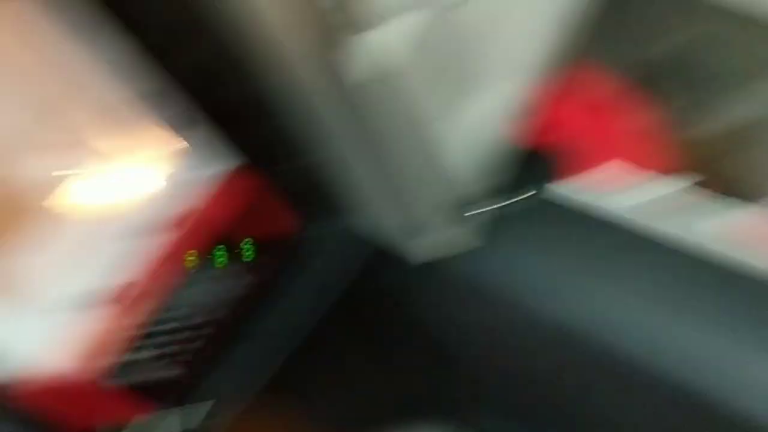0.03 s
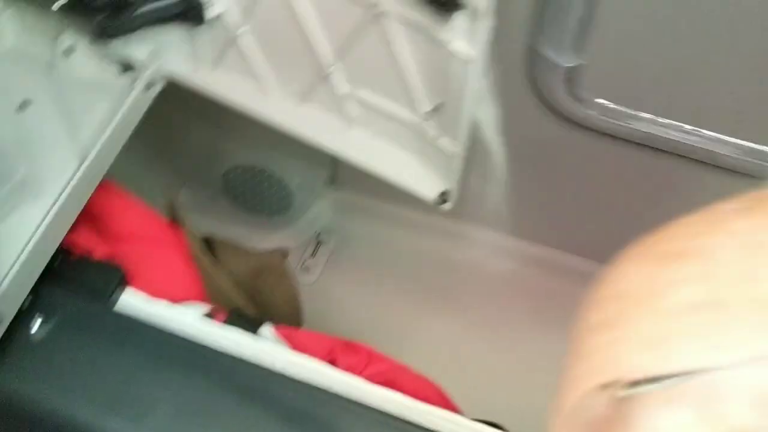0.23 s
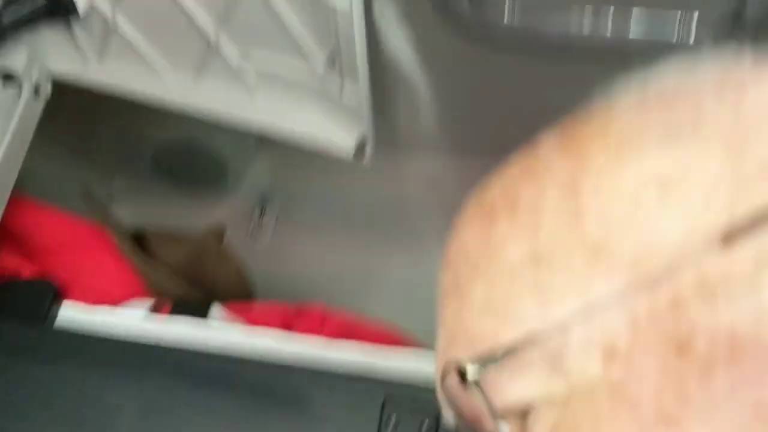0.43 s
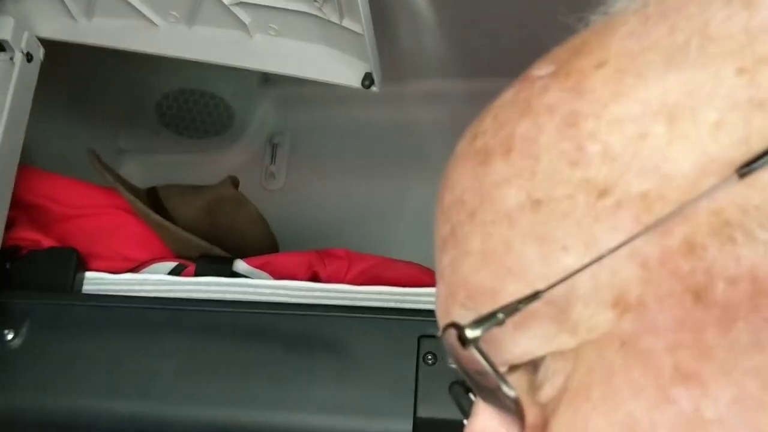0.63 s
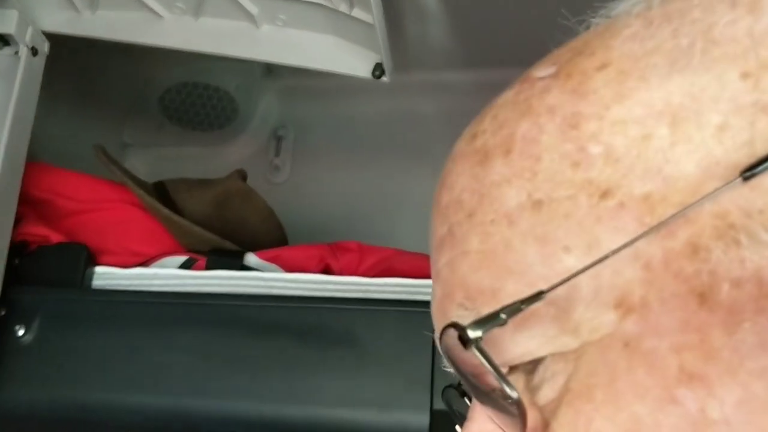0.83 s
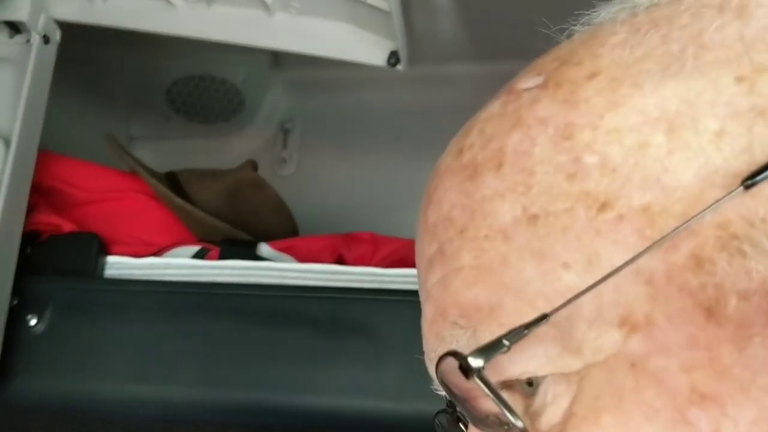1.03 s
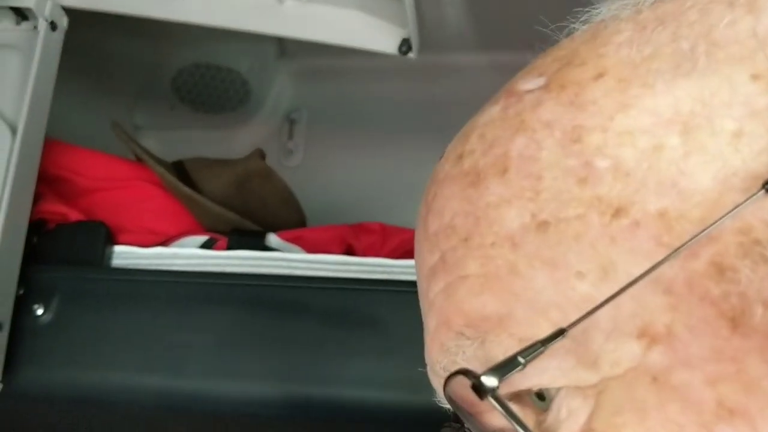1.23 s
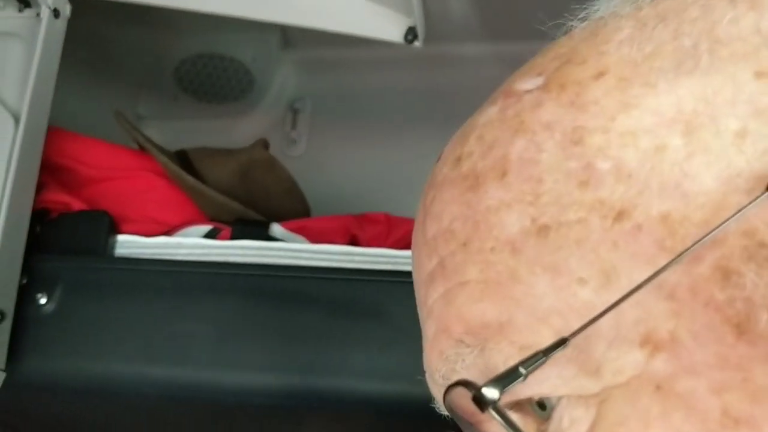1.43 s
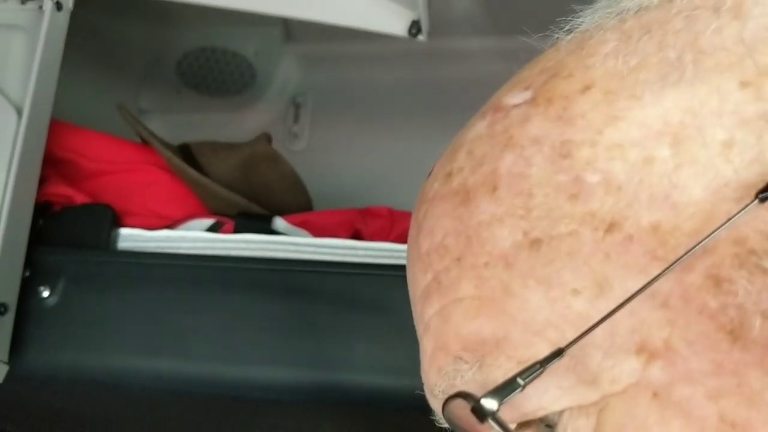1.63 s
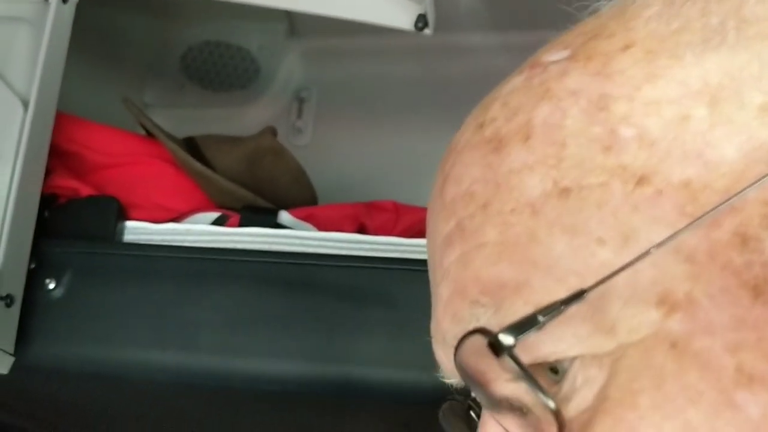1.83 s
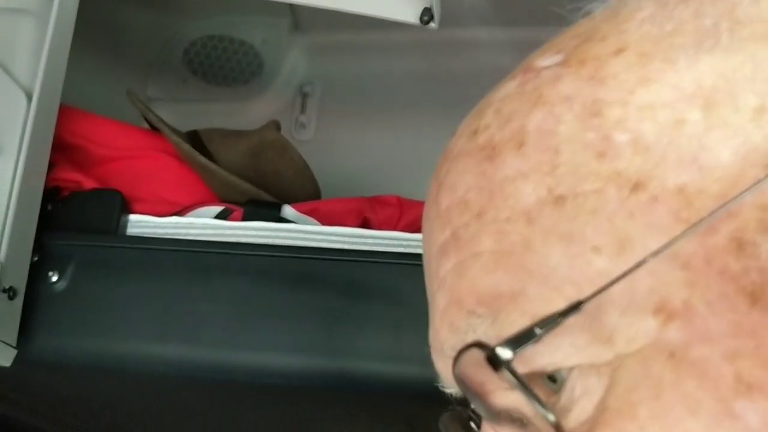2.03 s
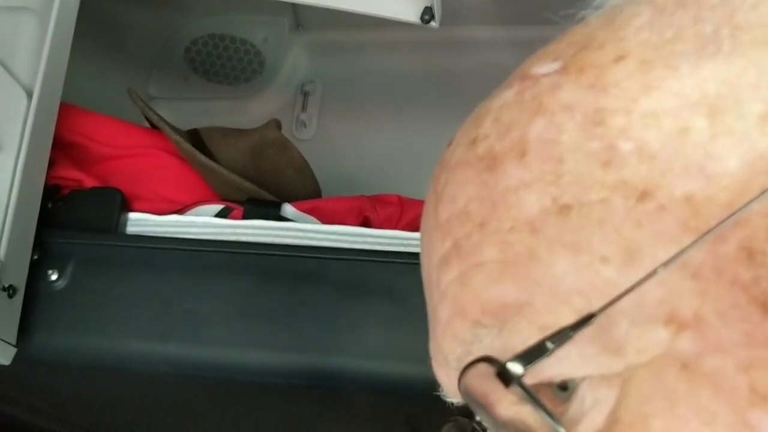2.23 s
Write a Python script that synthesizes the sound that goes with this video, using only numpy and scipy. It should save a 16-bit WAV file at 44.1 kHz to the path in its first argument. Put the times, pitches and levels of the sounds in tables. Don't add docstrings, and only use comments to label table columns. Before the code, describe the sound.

Low, rough diesel idle hums inside a cab, with close paper plate snaps, rustles and scrapes

```python
import sys
import numpy as np
from scipy import signal
from scipy.io import wavfile
from scipy.ndimage import uniform_filter1d

SR = 44100
rng = np.random.default_rng(int(sys.argv[2]) if len(sys.argv) > 2 else 0)


def wav_out(sig):
    wavfile.write(sys.argv[1], SR, np.round(np.clip(np.atleast_2d(sig).T, -1, 1) * 32767).astype(np.int16))


def ratio(d):
    e = np.asarray(d, float) / 20
    return 10 ** e


N = 100239

# frequency in Hz, level in dB.
RUMBLE = [(15, -66), (80, -72.5), (135, -78.5), (300, -83), (600, -88), (1000, -98), (1900, -107),
          (4000, -113)]
# frequency in Hz, level in dB.
HISS = [(500, -112), (2000, -112), (5000, -117), (9000, -118), (13000, -120), (16000, -123)]
ORDER_DB = [-37.9, -40.3, -40.9, -55, -45.9, -62.6, -38.2, -42.8, -71.7, -71, -68.8, -48.6, -54.1, -69.8,
            -61.9, -76.7, -66.6, -66.6, -66.5, -64.2, -63.4, -66.5, -66.8, -66.5, -71.4, -81, -84, -74.3,
            -84, -64.8]
# first tone number carried, delay into the cycle in seconds.
PATHS = [
    (1, .0216),
    (2, .0156),
    (4, .0359),
    (7, .0391),
    (9, .03365),
    (14, .0353),
]
# centre in seconds, length in seconds, level in dB, pitch in Hz.
BUMPS = [
    (.13, .09, -50, 82),
    (1.545, .12, -45, 176),
    (1.8, .05, -50, 45),
]
# centre in seconds, length in seconds, level in dB,
# rim level against the low part in dB, rim pitch in Hz.
BRUSHES = [(0.441, 0.15, -69.5, -1.5, 8040), (0.518, 0.12, -71.5, 4.5, 8300),
           (0.657, 0.13, -71.5, -2.5, 7400), (0.742, .1, -71.5, -5, 6130), (0.81, 0.091, -69.5, -4, 8300),
           (.875, 0.089, -64.5, -8.5, 5500), (0.94, 0.26, -82.5, 3, 7100), (1.141, 0.019, -64, -17, 8000),
           (1.208, 0.088, -61, -12.5, 8800), (1.317, 0.13, -71, -1, 5600), (1.395, 0.092, -65.5, -20, 5000),
           (1.553, 0.13, -58, -6, 9500), (1.724, 0.048, -66.5, -9.5, 9200), (1.92, 0.1, -67.5, -14, 5000),
           (2.071, 0.065, -69.5, -13, 6000), (2.241, .03, -73.5, 2, 7000), (2.275, 0.06, -64.5, -7.5, 9000)]
# start in seconds, length in seconds, body level in dB, edge level in dB.
SCRAPES = [(1.469, 0.0082, -58.5, -62), (1.476, 0.0074, -59, -60), (1.485, 0.014, -59.5, -61),
           (1.504, 0.011, -54, -59), (1.513, 0.007, -58, -64), (1.525, 0.0063, -50.5, -59),
           (1.532, 0.0044, -42.5, -48.5), (1.539, 0.016, -49.5, -55.5), (1.557, 0.013, -55, -55.5),
           (1.574, .007, -58, -58), (1.578, 0.0089, -55.5, -55), (1.596, .008, -57, -58.5),
           (1.606, 0.041, -75, -73), (1.79, 0.0086, -53, -60.5), (1.798, 0.0035, -60, -57),
           (1.801, 0.0062, -53.5, -49.5), (1.811, 0.0044, -53, -62), (1.818, 0.018, -69, -71),
           (2.236, 0.0065, -62, -73)]
# pitch in Hz, width in Hz, level in dB.
BODY = [(1250, 700, -15), (2280, 260, 0), (3030, 260, -7), (3550, 300, -13), (5000, 1200, -25)]
# pitch in Hz, width in Hz, level in dB.
EDGE = [(6300, 1900, -16), (8550, 2500, 10), (9500, 1080, 11.5), (10800, 2400, 9), (14000, 3900, -17)]
# start in seconds, peak level in dB, pitch in Hz, width in Hz.
SNAPS = [(0.091, -58, 3000, 3000), (0.4451, -24.5, 6960, 2370), (.5347, -50, 7000, 6000),
         (0.5937, -48.5, 3700, 2950), (.6325, -58, 2410, 600), (0.687, -56, 11500, 3000),
         (0.756, -56, 4500, 3000), (.802, -57, 6000, 6000), (1.0129, -48.5, 10200, 4000),
         (1.145, -55, 11000, 6000), (1.163, -52, 6000, 4000), (1.197, -50, 7460, 4000),
         (1.326, -45.5, 9900, 8000), (1.388, -53, 8050, 6000), (1.418, -57, 14000, 2500),
         (1.438, -56, 5000, 6000), (1.454, -68, 4000, 4000), (1.681, -55, 11600, 2500),
         (1.8122, -35, 8900, 5000), (1.851, -60, 10000, 1500), (2.238, -48, 1470, 900)]

FLOOR_DB, PATCH_DB = 33, 1.1
CYCLE_HZ, HUNT_S = 18.9785, .00012
HIGH_DB, HIGH_FALL_DB, HIGH_SPREAD_DB = -76.5, -.5, 4
SHAKE, SHAKE_PER_ORDER, MOST_SHAKE, SHAKE_HZ = 0.023, 0.017, .17, 9
SIZE_SHARE = .45
BRUSH_HZ, BRUSH_WIDTH_HZ, RIM_WIDTH_HZ = 2410, 2430, 2800
SLIPS_PER_S, SLIP_SPREAD_DB, SMOOTH = 1200, 2.5, .8
ECHO_S, ECHO_DB, TAIL_DB, TAIL_T60_S = .0016, -10, -37, .06
SPLIT, SPLIT_S = .35, .0004
KNOCK_DB, SKIRT = -7, 1.2
TOP_HZ, OPEN_S = 15650, .004


def evened(x):
    return x / np.sqrt(np.mean(x ** 2) + 1e-20)


def read(points, hz):
    f, value = np.transpose(points)
    return np.interp(np.log(hz + 1), np.log(f + 1), value)


def ring(x, hz, width):
    return signal.lfilter(*signal.iirpeak(min(hz, 20000), hz / width, SR), x)


def ring_twice(x, hz, width):
    return ring(ring(x, hz, width), hz, 2 * width)


def drift(count, top_hz):
    t = np.arange(0, N + 128, 64) / SR
    hz = np.geomspace(1.5, top_hz, num=12)
    turns = hz[:, None] * t + rng.random((count, len(hz), 1))
    slow = np.sin(2 * np.pi * turns).sum(axis=1) / np.sqrt(len(hz) / 2)
    return [np.interp(np.arange(N) / SR, t, row) for row in slow]


def window(start, length, rise):
    t = np.arange(N) / SR - start
    return np.sin(np.pi / 2 * np.clip(np.minimum(t, length - t) / rise, 0, 1)) ** 2


def stroke(start, length):
    t = np.arange(N) / SR - start
    catch = np.clip(t / 0.0021, 0, 1)
    return catch * np.cos(np.pi / 2 * np.clip(t / (1.45 * length), 0, 1))


def cab_floor():
    frames, hz = N // 512 + 6, np.fft.rfftfreq(2048, 1 / SR)
    real, imaginary, patches = rng.standard_normal((frames, len(hz), 3)).T
    patches = uniform_filter1d(patches, size=30, axis=0)
    patches = evened(uniform_filter1d(patches, size=6, axis=1))
    octaves_above = np.maximum(np.log2(hz / 4000 + 1e-9), 0)
    rumble = ratio(read(RUMBLE, hz) - 16 * octaves_above)
    gain = np.hypot(rumble, ratio(read(HISS, hz)))
    spectrum = (real + 1j * imaginary) * gain[:, None] * ratio(FLOOR_DB + PATCH_DB * patches)
    return signal.istft(spectrum, nperseg=2048, noverlap=1536)[1][:N] / 8


def engine():
    extra = np.arange(30)
    high = HIGH_DB + HIGH_FALL_DB * extra + HIGH_SPREAD_DB * rng.standard_normal(len(extra))
    levels = np.r_[ORDER_DB, high]
    t = np.arange(N) / SR + HUNT_S * drift(count=1, top_hz=4.09)[0]
    scatter = rng.random(len(levels))
    waver = drift(count=2 * len(levels), top_hz=SHAKE_HZ)
    out = np.zeros(N)
    for i, db in enumerate(levels):
        k = i + 1
        lag = scatter[i]
        if k < 22:
            lag = [s for first, s in PATHS if first <= k][-1]
        angle = 2 * np.pi * k * CYCLE_HZ * (t - lag)
        shake = min(SHAKE + SHAKE_PER_ORDER * k, MOST_SHAKE)
        size = 1 + SIZE_SHARE * min(1 + k / 30, 2) * shake * waver[2 * i]
        sway = shake * waver[2 * i + 1]
        out += ratio(db) * np.sqrt(2) * (size * np.cos(angle) + sway * np.sin(angle))
    return out


def bumps():
    t = np.arange(N) / SR
    out = np.zeros(N)
    for centre, length, db, hz in BUMPS:
        swell = window(centre - length / 2, length, length / 2)
        out += ratio(db) * swell * np.sin(2 * np.pi * hz * (t - centre))
    return out


def brushes():
    grain = ratio(2.2 * evened(uniform_filter1d(rng.standard_normal(N), size=90)))
    low, top = rng.standard_normal((2, N)) * grain
    low = evened(ring_twice(low, BRUSH_HZ, BRUSH_WIDTH_HZ))
    out = np.zeros(N)
    for centre, length, db, rim_db, rim_hz in BRUSHES:
        rim = evened(ring_twice(top, rim_hz, RIM_WIDTH_HZ))
        swell = window(centre - length / 2, length, length / 2)
        out += swell * ratio(db) * (low + ratio(rim_db) * rim)
    return out


def plate_ring(x, modes):
    out = np.zeros(N)
    for k, (hz, width, db) in enumerate(modes):
        out += (-1) ** k * ratio(db) * ring_twice(x, hz, width)
    return out


def scrapes():
    slips = (rng.random(N) < SLIPS_PER_S / SR) * ratio(SLIP_SPREAD_DB * rng.exponential(1, N))
    puffs = signal.lfilter([1], [1, -np.exp(-1 / (0.0015 * SR))], slips)
    drive = evened(rng.standard_normal(N) * (SMOOTH + evened(puffs)))
    body = sum(ratio(db) * stroke(s, length) for s, length, db, _ in SCRAPES) * drive
    edge = sum(ratio(db) * stroke(s, length) for s, length, _, db in SCRAPES) * drive
    body_sound = plate_ring(body, BODY) / plate_ring(drive, BODY).std()
    edge_sound = plate_ring(edge, EDGE) / plate_ring(drive, EDGE).std()
    return body_sound + edge_sound


def snaps():
    out, t = np.zeros(N + 4000), np.arange(4000) / SR
    noises = rng.standard_normal((len(SNAPS), len(t)))
    for (start, db, hz, width), noise in zip(SNAPS, noises):
        tail = ratio(TAIL_DB - 60 * t / TAIL_T60_S) * noise * np.minimum(t / 0.0022, 1)
        kick = tail + SPLIT * noise * np.exp(-t / SPLIT_S)
        kick[0] = 1
        kick[int(ECHO_S * SR)] = ratio(ECHO_DB)
        narrow = evened(ring_twice(kick, hz, width))
        wide = evened(ring(ring(kick, hz, min(SKIRT * width, 15000)), hz, 13000))
        sound = narrow + ratio(KNOCK_DB) * wide
        out[round(start * SR):][:len(t)] += ratio(db) * sound / abs(sound).max()
    return out[:N]


def scene():
    return (cab_floor() + engine() + bumps() + brushes() + scrapes() + snaps())[None]


def top_cut(x):
    return signal.sosfilt(signal.butter(12, 16250, fs=SR, output="sos"), x)


def record(dry):
    taps = signal.firwin(401, TOP_HZ, window=("kaiser", 9), fs=SR)[None]
    padded = np.pad(dry, ((0, 0), (200, 200)), "reflect", reflect_type="odd")
    limited = signal.oaconvolve(padded, taps, "valid")
    return top_cut(limited * window(0, 9, OPEN_S))


dry = scene()
out = record(dry)
wav_out(out)
```